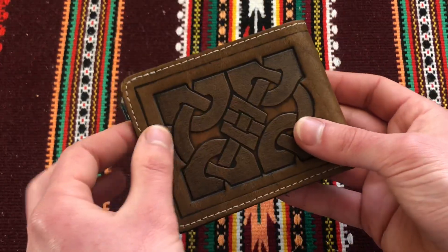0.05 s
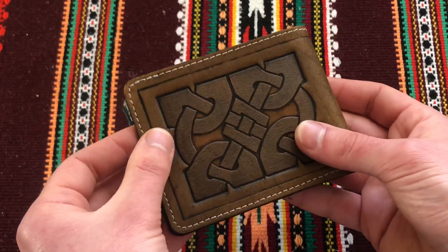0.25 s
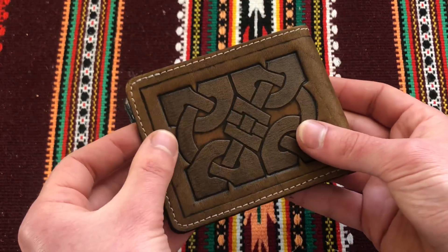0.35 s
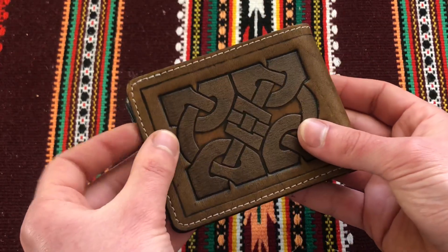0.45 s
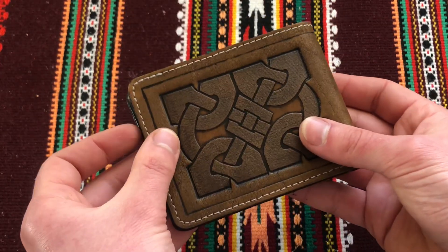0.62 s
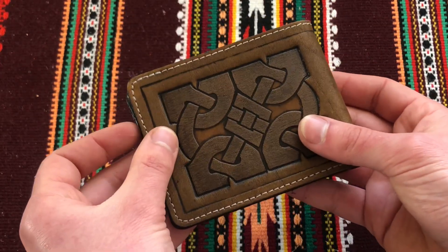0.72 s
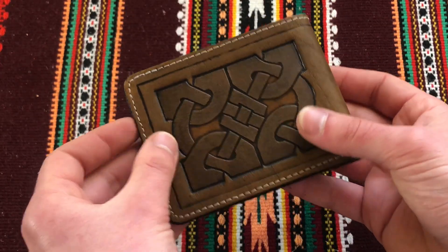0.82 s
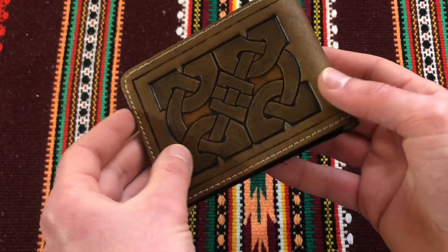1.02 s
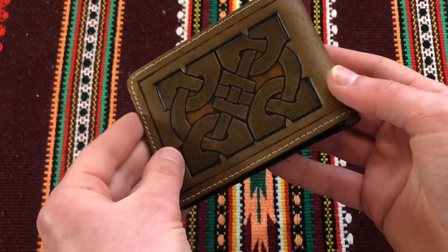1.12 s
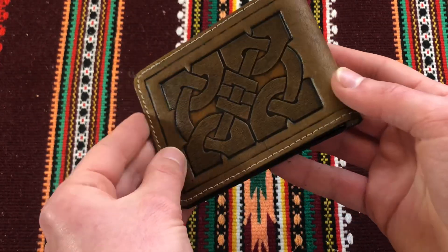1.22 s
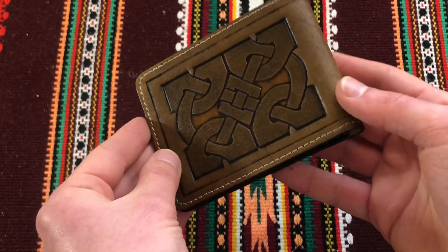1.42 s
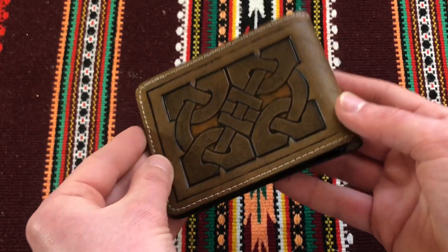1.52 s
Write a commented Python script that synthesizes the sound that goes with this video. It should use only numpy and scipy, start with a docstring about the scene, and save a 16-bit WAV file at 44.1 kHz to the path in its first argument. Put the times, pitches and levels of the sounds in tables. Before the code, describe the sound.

Two sharp clicks from a leather wallet being handled, the second louder.

```python
"""Snap of a leather wallet

A stiff leather wallet is turned in the hands, close by in a small quiet room. It catches with a
quick double tick, then snaps once, louder: each sudden release is an impulse that excites a few
damped modes and a brief reverberation. The fingers tap faintly and afterwards slide over the
leather with soft friction noise, above a faint steady hiss and rumble."""
import sys
import numpy as np
from scipy import signal
from scipy.fft import rfft, irfft
from scipy.io import wavfile
from scipy.ndimage import uniform_filter1d

SR = 44100
rng = np.random.default_rng(int(sys.argv[2]) if len(sys.argv) > 2 else 0)


def file_out(sig):
    """Save sig as 16-bit WAV at sys.argv[1]."""
    # one column per channel
    cols = np.atleast_2d(sig).T
    # limit, then scale
    lim = np.clip(cols, -1, 1)
    pcm = np.round(lim * 32767).astype(np.int16)
    wavfile.write(sys.argv[1], SR, pcm)


N = 68355

# ticks as the leather catches: start_s, level_db
CATCH_TICKS = [(0.2423, -1.5), (0.2433, 1.5), (0.2443, -34)]
# spectrum of a tick's pulse: frequency_hz, level_db
CATCH_SPECTRUM = [(60, -28), (170, -15.5), (550, -11), (1300, -26), (2250, -4), (2900, -10.5), (4400, -3.5),
                  (6200, -3.5), (9200, -9.5), (11000, -18), (14500, -5.5), (16000, -17)]
# modes that ring after a tick: pitch_hz, level_db, t60_s
CATCH_RESONANCES = [(4380, -34.5, 0.018), (4887, -49, 0.085), (6090, -44.5, .04)]
# spectrum of the snap's pulse: frequency_hz, level_db
SNAP_SPECTRUM = [(59, -62), (100, -21), (634, -19), (1170, -12), (2580, 0), (3940, -6.5), (5770, -5),
                 (6840, -2.5), (7450, -6), (8110, -15.5), (9410, -1.5), (11400, -14.5), (13500, -3),
                 (14700, -11.5), (16000, -17.5)]
# modes that ring after the snap: pitch_hz, level_db, t60_s
SNAP_RESONANCES = [(828, -48, .012), (2677, -61, 0.098), (2930, -67.5, .13), (7374, -49, 0.06)]
# fingertip contacts: start_s, level_db, pitch_hz
FINGER_TAPS = [(0.016, -50.5, 1720), (0.1490, -62, 1900), (0.7572, -67, 1710), (0.9195, -58.5, 1800)]
# envelope of the sliding friction: time_s, level_db
SLIDE_ENVELOPE = [(0, -78), (.14, -77), (.2, -77.5), (.48, -78.5), (.58, -68.5), (.7, -72.5), (.82, -70.5),
                  (.89, -72.5), (1.04, -70), (1.18, -73.5), (1.3, -77), (1.45, -110), (1.53, -79.5),
                  (1.55, -81.5)]
# share of the sliding power that is fine hiss: time_s, share_0_to_1
SLIDE_HISS_SHARE = [(0, .7), (.2, 0.97), (.6, 0), (.8, 0.68), (1, 1), (1.2, 0.96), (1.55, .4)]
# spectral density of the dull drag: frequency_hz, relative_db
DRAG_SPECTRUM = [(200, -5.5), (700, -3.5), (1400, 5), (2000, -1.5), (2600, 2.5), (3300, -3.5), (4400, -0.5),
                 (6500, -9.5), (10000, -24.5), (16000, -17)]
# spectral density of the fine hiss: frequency_hz, relative_db
HISS_SPECTRUM = [(200, -7.5), (1400, 5), (3200, 0.5), (4500, 6), (6000, 0), (8000, 1), (12000, -3.5),
                 (16000, -3)]
# envelope of the hands shifting their grip: time_s, level_db
GRIP_ENVELOPE = [(0, -88), (.04, -65), (.1, -74), (.55, -92), (.64, -66.5), (.77, -95), (.9, -65.5),
                 (.96, -69.5), (1.06, -71.5), (1.18, -73.5), (1.38, -69.5), (1.45, -76.5), (1.49, -74),
                 (1.55, -92)]
# spectral density of the grip's rub: frequency_hz, relative_db
GRIP_SPECTRUM = [(30, -21), (100, -10), (180, -3), (240, -7.5), (350, -8), (500, -19), (900, -23),
                 (3000, -50.5)]
# reverberation time of the room: frequency_hz, t60_s
ROOM_DECAY = [(200, 0.46), (1000, 0.4), (3000, 0.32), (6000, 0.26), (10000, 0.24), (15000, 0.15)]
# colouring of the reflections: frequency_hz, gain_db
ROOM_SPECTRUM = [(150, 5.5), (600, 3.5), (1500, -1), (2400, -4.5), (3200, 3.5), (5000, 0), (7000, -2),
                 (9500, -5), (14000, 0.5)]
# spectral density of the steady background: frequency_hz, relative_db
BACKGROUND_SPECTRUM = [(20, -21.5), (60, -0.5), (120, -1.5), (180, 3.5), (230, -4), (340, -3), (600, -8.5),
                       (1200, -13.5), (2200, -18), (4000, -22), (8000, -26.5), (15500, -31)]


def wallet(snap_s=0.3406, snap_db=8.5):
    """Superposition of transients: the stiff leather catches in quick ticks, then snaps."""
    out = np.zeros(N)
    tick = click(CATCH_SPECTRUM, CATCH_RESONANCES)
    for start_s, level_db in CATCH_TICKS:
        add(out, start_s, amp(level_db) * tick)
    add(out, snap_s, amp(snap_db) * click(SNAP_SPECTRUM, SNAP_RESONANCES))
    return out


def click(spectrum, modes, crinkle_db=-10.5, crinkle_t60_s=0.019):
    """Impulse excitation: a sudden release gives a pulse, a crinkle of settling fibres and weak modes."""
    crack = pulse(spectrum)
    t = np.arange(len(crack)) / SR
    settling = rng.standard_normal(len(t)) * amp(-60 * t / crinkle_t60_s) * np.minimum(t / 0.0009, 1)
    crinkle = signal.fftconvolve(crack, settling / np.linalg.norm(settling))[:len(t)]
    ring = sum(amp(db - 60 * t / t60_s) * np.cos(2 * np.pi * hz * t) for hz, db, t60_s in modes)
    return crack + amp(crinkle_db) * crinkle + ring


def finger_taps(t60_s=0.012, grit_gain=0.24):
    """Damped vibration: each touch on the leather excites one mode and a little noise."""
    out = np.zeros(N)
    t = np.arange(SR // 20) / SR
    for start_s, level_db, pitch_hz in FINGER_TAPS:
        mode = np.sin(2 * np.pi * pitch_hz * t)
        grit = grit_gain * rng.standard_normal(len(t))
        add(out, start_s, amp(level_db - 60 * t / t60_s) * (mode + grit))
    return out


def finger_friction(grain_db=1.5):
    """Friction noise: skin slides on leather, from dull drag to fine hiss, over the grip's low rub."""
    hiss_share = np.clip(curve(SLIDE_HISS_SHARE), 0, 1)
    flicker = evened(uniform_filter1d(rng.standard_normal(N), size=60))
    grain = evened(amp(grain_db * flicker))
    drag = np.sqrt(1 - hiss_share) * noise(DRAG_SPECTRUM)
    hiss = np.sqrt(hiss_share) * noise(HISS_SPECTRUM)
    grip = amp(curve(GRIP_ENVELOPE)) * noise(GRIP_SPECTRUM)
    return amp(curve(SLIDE_ENVELOPE)) * grain * (drag + hiss) + grip


def room(source, gain_db=-13.5, rise_s=0.0032):
    """Reverberation: the dense reflections of a small room decay exponentially, the treble first."""
    t = np.arange(SR // 2) / SR
    hz, frame_s, reflections = signal.stft(rng.standard_normal(len(t)), SR, nperseg=256)
    decay = amp(-60 * frame_s / read(ROOM_DECAY, hz)[:, None])
    tail = signal.istft(reflections * decay, SR)[1][:len(t)] * np.minimum(t / rise_s, 1)
    response = signal.fftconvolve(tail / np.linalg.norm(tail), pulse(ROOM_SPECTRUM))
    return amp(gain_db) * signal.fftconvolve(source, response)[:N]


def background(level_db=-67):
    """Stationary noise: a faint hiss and rumble."""
    return amp(level_db) * noise(BACKGROUND_SPECTRUM)


def amp(db):
    """Amplitude ratio of a level in decibels."""
    return 10 ** (np.asarray(db) / 20)


def evened(x):
    """Normalisation to rms 1."""
    return x / np.sqrt(np.mean(x ** 2) + 1e-20)


def read(points, hz):
    """Interpolation on a log-frequency axis."""
    f, value = np.transpose(points)
    return np.interp(np.log(hz + 1), np.log(f + 1), value)


def curve(points):
    """Linear interpolation of a control curve at every sample."""
    return np.interp(np.arange(N) / SR, *np.transpose(points))


def add(mix, s, sound):
    """Superposition: a sound joins the mix at s seconds."""
    part = mix[max(round(s * SR), 0):][:len(sound)]
    part += sound[:len(part)]


def noise(tone):
    """Spectral shaping: noise of rms 1 with the given spectrum."""
    return evened(irfft(rfft(rng.standard_normal(N)) * amp(read(tone, np.fft.rfftfreq(N, 1 / SR))), N))


def pulse(tone, size=8192):
    """Minimum phase: the sharpest causal pulse with the given spectrum."""
    log_gain = np.log(amp(read(tone, abs(np.fft.fftfreq(size, 1 / SR)))))
    return np.fft.ifft(np.exp(np.conj(signal.hilbert(log_gain)))).real


def scene():
    """Superposition: transients, their reverberation, friction and background add in mono."""
    transients = wallet() + finger_taps()
    return (transients + room(transients) + finger_friction() + background())[None]


def record(dry):
    """Band limiting: a low-pass filter removes the highest treble."""
    cutoff_hz = 15900
    low_pass = signal.firwin(255, cutoff_hz, window=("kaiser", 8), fs=SR)
    return signal.oaconvolve(dry, low_pass[None], "same")


dry = scene()
out = record(dry)
file_out(out)
```